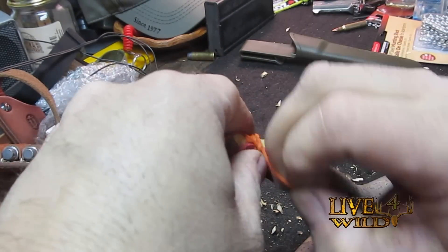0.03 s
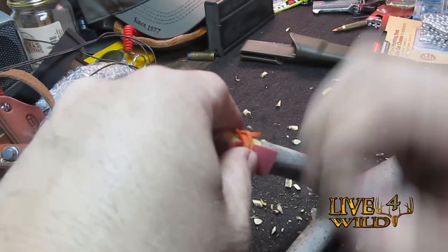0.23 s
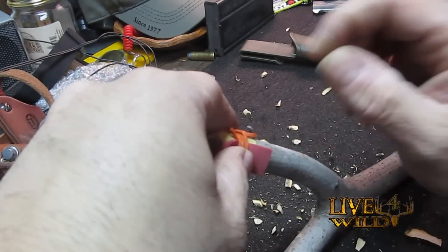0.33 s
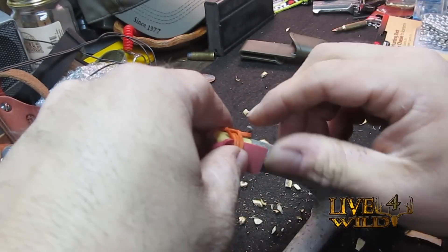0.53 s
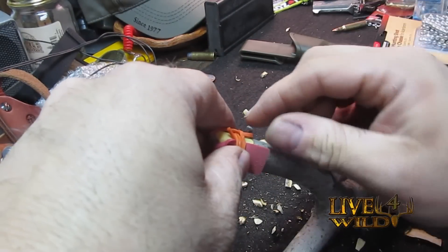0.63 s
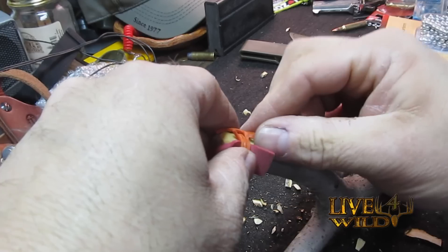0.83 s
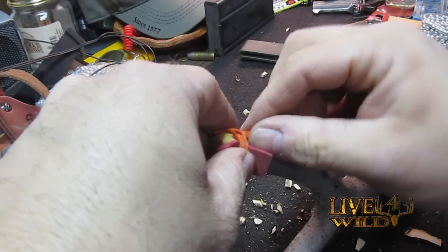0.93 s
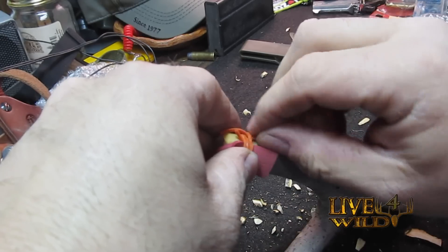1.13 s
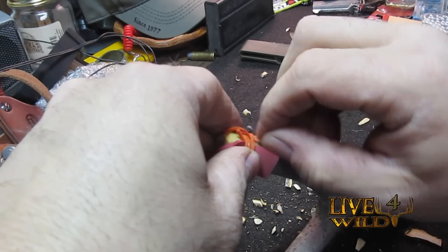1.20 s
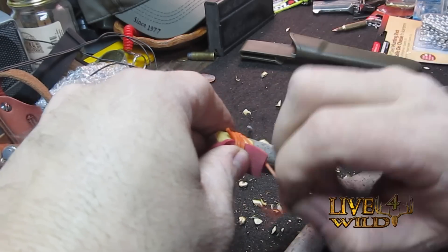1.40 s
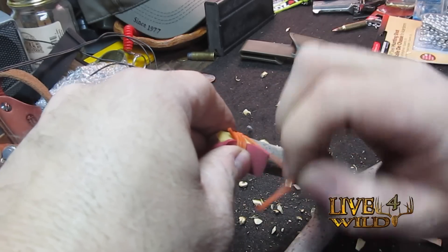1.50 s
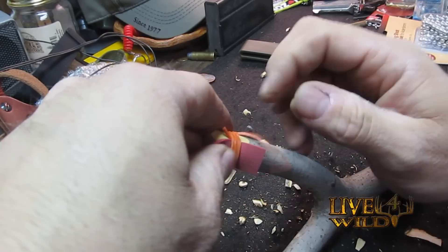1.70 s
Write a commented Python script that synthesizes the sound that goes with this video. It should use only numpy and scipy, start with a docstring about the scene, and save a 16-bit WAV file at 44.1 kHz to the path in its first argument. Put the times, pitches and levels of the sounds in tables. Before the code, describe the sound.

A stretched elastic band snaps sharply up close, then its loose end slaps back more softly.

```python
"""A cluttered workbench in a small, dry room, where fingers work an elastic band close to the microphone.
The taut band snaps once, hard: the impact excites damped modes of the held piece and the bench, and the
freed band twangs. Later its loose end slaps back. Small hard parts tick, skin rubs on rubber and the hands
bump softly, over room hiss and mains hum. Automatic gain control ducks the background after the snap."""
import sys
import numpy as np
from scipy import signal
from scipy.fft import rfft, irfft
from scipy.io import wavfile
from scipy.ndimage import uniform_filter1d

SR = 44100
rng = np.random.default_rng(int(sys.argv[2]) if len(sys.argv) > 2 else 0)


def digitize_waveform(pressure):
    """Quantize a signal to 16-bit integers and store it at the path in sys.argv[1].

    Rows of a 2-D input are taken as channels; values are limited to [-1, 1].
    """
    field = np.atleast_2d(pressure).T
    bounded = np.clip(field, -1, 1)
    quanta = np.round(bounded * 32767).astype(np.int16)
    wavfile.write(sys.argv[1], SR, quanta)


N = 77175


def amp(db):
    """Decibel law: 20 dB is a factor of ten in amplitude."""
    return 10 ** (np.asarray(db) / 20)


def unit(x):
    """Normalisation to rms 1."""
    return x / np.sqrt(np.mean(x ** 2) + 1e-20)


def read(points, hz):
    """Interpolation on a log-frequency axis."""
    f, value = np.transpose(points)
    return np.interp(np.log(hz + 1), np.log(f + 1), value)


def pan(db):
    """Level-difference panning: the left gain exceeds the right by db."""
    return amp(np.array([[db / 2], [-db / 2]]))


def add(mix, s, sound):
    """Superposition: a stereo sound joins the mix at s seconds."""
    part = mix[:, max(round(s * SR), 0):][:, :sound.shape[1]]
    part += sound[:, :part.shape[1]]


def correlate(z, correlation):
    """Partial correlation: two independent channels are mixed to share a component."""
    correlation = np.clip(correlation, -1, 1)
    return np.array([z[0], correlation * z[0] + np.sqrt(1 - correlation ** 2) * z[1]])


def noise(spectrum, correlation):
    """Spectral shaping of white noise gives steady, coloured stereo noise of rms 1."""
    hz = np.fft.rfftfreq(N, 1 / SR)
    white = correlate(rfft(rng.standard_normal((2, N))), read(correlation, hz))
    return unit(irfft(white * amp(read(spectrum, hz)), N))


# Imbalance of the two microphone ports for close sounds: (frequency [Hz], left-right [dB])
PORT_BALANCE = [(200, 1), (1500, -1.5), (2500, -2.5), (4000, -2.5), (7000, 1.5), (9300, 0)]


def impulse(spectrum, tilt_db_per_octave=0, size=4096):
    """Minimum-phase response of a spectrum at the two ports, mean energy 1."""
    hz = abs(np.fft.fftfreq(size, 1 / SR))
    gain_db = read(spectrum, hz) + tilt_db_per_octave * np.log2(hz + 1)
    gain_db = gain_db + np.outer([.5, -.5], read(PORT_BALANCE, hz))
    response = np.exp(np.conj(signal.hilbert(np.log(amp(gain_db)))))
    pulse = np.fft.ifft(response).real[:, :size // 2]
    return pulse * np.sqrt(2) / np.linalg.norm(pulse)


def contact(decay_s, correlation, size=4096, phase_corner_hz=1500):
    """Broadband excitation: a quick rattle of tiny contacts, energy 1 per channel."""
    age = np.arange(size) / SR / decay_s
    envelope = (.15 + age) * np.exp(-1.6 * age)
    burst = rng.standard_normal(size) * envelope
    for _ in range(12):  # flatten the spectrum and restore the envelope in turn
        flat = rfft(burst)
        flat /= abs(flat) + 1e-12
        burst = irfft(flat)
        burst = burst * envelope / np.sqrt(abs(uniform_filter1d(burst ** 2, size=12)) + 1e-12)
    # The ports differ in phase, more so above the corner
    hz = np.fft.rfftfreq(size, 1 / SR)
    wander = unit(uniform_filter1d(uniform_filter1d(rng.standard_normal(len(hz)), size=90), size=90))
    phase = wander * np.arccos(correlation) * (hz + phase_corner_hz / 4) / (hz + phase_corner_hz)
    burst = irfft(flat * np.exp(1j * np.outer([.5, -.5], phase))) * np.exp(-(age / 6) ** 4)
    return burst / np.linalg.norm(burst, axis=1, keepdims=True)


def strike(spectrum, modes, db, contact_s, pan_db, tilt_db_per_octave=0):
    """Impact: a crack, its early reflections from hands and bench, and exponentially damped modes."""
    t = np.arange(SR // 3) / SR
    arrivals = np.zeros((2, len(t)))
    blow = contact(contact_s, correlation=.69)
    reflections = amp(-10.5) * contact(decay_s=.0035, correlation=.57)
    add(arrivals, 0, blow)
    add(arrivals, .0012, reflections)
    crack = signal.fftconvolve(arrivals, impulse(spectrum, tilt_db_per_octave), axes=1)[:, :len(t)]
    resonance = sum(amp(level - 60 * t / t60) * np.sin(2 * np.pi * hz * t) for hz, level, t60 in modes)
    ring = signal.fftconvolve(blow, resonance[None])[:, :len(t)]
    return amp(db) * pan(pan_db) * (crack + ring)


# Mains harmonics: (frequency [Hz], level [dB])
HUM_PARTIALS = [(60, -65.5), (120, -60)]
# Room hiss: (frequency [Hz], relative density [dB])
AIR_SPECTRUM = [(20, -18), (45, -6.5), (85, -2.5), (150, -4.5), (270, -1), (420, -5.5), (650, -9),
                (1000, -12), (1500, -11.5), (1750, -9.5), (2100, -8), (2400, -13.5), (2800, -11),
                (3300, -17.5), (4000, -18.5), (4700, -22), (5200, -19.5), (5550, -8.5), (5800, -15.5),
                (6100, -22.5), (7500, -24), (8400, -21.5), (9000, -24.5), (10400, -26.5)]
# Likeness of the two channels: (frequency [Hz], correlation [0-1])
AIR_CORRELATION = [(100, 0.3), (300, 0.24), (600, 0.19), (1700, .25), (3000, 0), (4800, 0.6), (5550, 0.28),
                   (6500, 0.5), (10000, 0.3)]


def air():
    """Stationary background: harmonic mains hum, and hiss with a narrow peak heard as a thin whine."""
    t = np.arange(N) / SR
    hum = sum(amp(db) * np.sqrt(2) * np.sin(2 * np.pi * (hz * t + rng.random()))
              for hz, db in HUM_PARTIALS)
    hiss = amp(-52.5) * noise(AIR_SPECTRUM, AIR_CORRELATION)
    return pan(db=-1.8) * (hiss + hum)


# Reverberation time of the room: (frequency [Hz], T60 [s])
ROOM_DECAY = [(150, 0.256), (300, .3), (800, 0.24), (2500, 0.13), (9000, 0.13)]


def room(x, level_db=-12, delay_s=.004):
    """Reverberation: a short diffuse tail decays exponentially, its treble first."""
    diffuse = correlate(rng.standard_normal((2, SR // 2)), correlation=.58)
    hz, t, bands = signal.stft(diffuse, SR, nperseg=256)
    tail = signal.istft(bands * amp(-60 * t / read(ROOM_DECAY, hz)[:, None]), SR)[1]
    out = np.zeros((2, N))
    add(out, delay_s, signal.fftconvolve(x, tail / np.linalg.norm(tail[0]), axes=1))
    return amp(level_db) * out


# Gaussian finger strokes: (centre time [s], standard deviation [s], level [dB])
RUB_STROKES = [(0.07, 0.12, -59.5), (0.414, 0.032, -52.5), (0.85, .03, -59.5), (0.957, 0.042, -57),
               (1.093, 0.033, -57), (1.386, 0.017, -55), (1.522, 0.02, -52), (1.72, 0.084, -55.5)]
# Friction noise: (frequency [Hz], relative density [dB])
RUB_SPECTRUM = [(100, -8), (1000, 0), (2500, -1.5), (4000, -1), (6000, -4), (10400, -13.5)]


def rubs(grain_db=3):
    """Sliding friction: skin on rubber makes a fine-grained hiss."""
    t = np.arange(N) / SR
    strokes = sum(amp(db) * np.exp(-((t - s) / width) ** 2 / 2) for s, width, db in RUB_STROKES)
    grain = unit(amp(grain_db * unit(uniform_filter1d(rng.standard_normal(N), size=60))))
    return strokes * grain * noise(RUB_SPECTRUM, AIR_CORRELATION)


# Bumps of the hands: (time [s], energy [dB], decay time [s])
BUMP_EVENTS = [(0.005, -22, 0.023), (0.632, -23, .007), (0.776, -24.5, 0.018), (0.885, -26, 0.024),
               (1.035, -24.5, 0.0156), (1.415, -21.5, .02), (1.490, -14.5, .011), (1.572, -22.5, 0.0126)]
# Dull thud: (frequency [Hz], relative level [dB])
BUMP_SPECTRUM = [(40, -29), (130, -1), (250, 7.5), (400, -8.5), (800, -14.5), (3000, -16), (10000, -40)]


def bumps():
    """Soft impact: the hands bump with most of their energy at low frequencies."""
    out = np.zeros((2, N))
    for s, db, decay_s in BUMP_EVENTS:
        blow = contact(decay_s, correlation=.88)
        add(out, s, amp(db) * signal.fftconvolve(blow, impulse(BUMP_SPECTRUM), axes=1))
    return out


# Light tick: (time [s], energy [dB], contact time [s], left-right [dB])
TICK_EVENTS = [(0.3915, -18.5, 0.00155, -8)]
# Its attack: (frequency [Hz], relative level [dB])
TICK_SPECTRUM = [(100, -4), (1000, -8), (2200, -12), (2800, -7), (3800, -3), (4700, -14), (5900, 6),
                 (7300, -0.5), (8300, -7), (10200, -4)]
# Resonances of the small part: (frequency [Hz], relative level [dB], T60 [s])
PART_MODES = [(2230, -23.5, 0.039), (5900, -25, .025), (6551, -28, .045), (7320, -31, .025)]


def ticks():
    """Modal ringing: a small hard part, lightly knocked, sounds its high modes."""
    out = np.zeros((2, N))
    for s, *blow in TICK_EVENTS:
        add(out, s, strike(TICK_SPECTRUM, PART_MODES, *blow))
    return out


# Dry clicks: (time [s], energy [dB], contact time [s], left-right [dB], tilt [dB/octave])
CLICK_EVENTS = [(0.5898, -24, .001, -8, 14.5), (1.7400, -9, 0.00026, -1.5, -0.5)]
# Their attack before the tilt: (frequency [Hz], relative level [dB])
CLICK_SPECTRUM = [(60, -16), (250, -9), (600, -22), (1200, -4.5), (1700, -7), (2050, 3.5), (2600, 0),
                  (4200, 2), (5000, -3.5), (7000, 0), (9000, -9.5), (10400, -17)]
# Held piece and bench, also struck by the band: (frequency [Hz], relative level [dB], T60 [s])
BENCH_MODES = [(286, -54, 0.26), (1487, -48.5, .07), (2064, -40.5, 0.031), (2534, -34, 0.03),
               (3320, -46, 0.02), (5650, -54, 0.071), (6750, -46, 0.032), (9550, -52, .035)]


def clicks():
    """Hard impact: brief contacts of handled parts excite a wide band of frequencies."""
    out = np.zeros((2, N))
    for s, *blow in CLICK_EVENTS:
        add(out, s, strike(CLICK_SPECTRUM, BENCH_MODES, *blow))
    return out


# Hiss around snap and slap: (peak time [s], lead [s], trail [s], peak level [dB], rise over lead [dB])
SWELL_EVENTS = [(0.175, 0.057, 0.041, -34, 11), (1.491, 0.033, 0.036, -43.5, 7.5)]
# Its colour: (frequency [Hz], relative density [dB])
SWELL_SPECTRUM = [(100, -25), (700, 2), (2500, 0), (4000, -2.5), (6000, -4), (9300, -0.5), (10400, -3.5)]


def swells(fade_s=.014):
    """Amplitude modulation of noise: a short hiss grows until the band lands, then fades."""
    t = np.arange(N) / SR
    envelope = np.zeros(N)
    for s, lead, trail, db, rise_db in SWELL_EVENTS:
        gate = np.clip(np.minimum(t - s + lead, s + trail - t) / fade_s, 0, 1)
        envelope += gate * amp(db - rise_db * np.clip(abs(t - s) / lead, 0, 1))
    return envelope * noise(SWELL_SPECTRUM, correlation=[(100, .58), (10000, .17)]) * pan(db=-2.5)


# Landings of the loose end: (time [s], energy [dB], contact time [s], left-right [dB])
SLAP_EVENTS = [(1.4891, -8, .0014, -3), (1.4911, -6, 0.0008, -4.5)]
# Their attack: (frequency [Hz], relative level [dB])
SLAP_SPECTRUM = [(40, -26), (110, -3), (200, -5), (400, -15), (600, -2.5), (850, -8), (1300, -17.5),
                 (1700, -9.5), (2030, 4), (2300, -10), (2520, 2.5), (2850, -10.5), (3700, 0.5),
                 (4700, -11.5), (5700, -3), (6500, -10.5), (7500, -14.5), (8400, -13), (10400, -19)]


def slap():
    """Temporal fusion: two impacts of the band's loose end, 2 ms apart, are heard as one slap."""
    out = np.zeros((2, N))
    for s, *blow in SLAP_EVENTS:
        add(out, s, strike(SLAP_SPECTRUM, BENCH_MODES, *blow))
    return out


def twang(start_hz=209.2, rise_hz_per_s=590, level_db=-36, t60_s=.21):
    """Damped free vibration: the freed band sounds a low note that rises as it settles."""
    t = np.arange(SR // 4) / SR
    cycles = np.cumsum(start_hz + rise_hz_per_s * t) / SR
    return amp(level_db - 60 * t / t60_s) * np.sin(2 * np.pi * cycles)


# Crack of the taut band: (frequency [Hz], relative level [dB])
SNAP_SPECTRUM = [(40, -18), (110, -10), (220, -8.5), (350, -3.5), (600, -7.5), (1100, -6), (1800, -8),
                 (2200, -4.5), (2520, 2), (3000, -3), (4000, -2), (5000, -7), (5600, -6.5), (6100, -11),
                 (6620, -2), (7300, -11), (8100, -8.5), (8900, -2), (9600, -2.5), (10400, -12)]


def snap(time_s=.1702, pan_db=-2):
    """Release of elastic energy: the taut band lands in one hard impact and twangs."""
    out = np.zeros((2, N))
    add(out, time_s, strike(SNAP_SPECTRUM, BENCH_MODES, db=9.5, contact_s=.00065, pan_db=pan_db))
    add(out, time_s, pan(pan_db) * twang())
    return out


def scene():
    """Superposition of the sharp impacts, their reverberation, the handling and the background."""
    impacts = snap() + slap() + ticks() + clicks()
    return impacts + room(impacts) + swells() + rubs() + bumps() + air()


def band_limit(x, cutoff_hz=10700):
    """Linear-phase filtering: a steep low-pass."""
    taps = signal.firwin(301, cutoff_hz, window=("kaiser", 8), fs=SR)
    return signal.oaconvolve(x, taps[None], "same")


def record(dry):
    """Automatic gain control dips after a loud sound and recovers slowly; saturation rounds the peaks."""
    threshold_db, recovery_db_per_s, attack_s, ceiling = -23, 23, .052, .95
    window = SR // 100
    power = signal.lfilter(np.ones(window) / window, 1, (dry ** 2).mean(0))
    recovery_db = np.arange(N) / SR * recovery_db_per_s
    held_db = np.maximum.accumulate(10 * np.log10(power + 1e-12) + recovery_db) - recovery_db
    excess_db = np.maximum(held_db - threshold_db, 0)
    pole = np.exp(-1 / (attack_s * SR))
    reduction_db = signal.lfilter([1 - pole], [1, -pole], excess_db)
    ducked = band_limit(dry / amp(reduction_db))
    return band_limit(ducked / (1 + (ducked / ceiling) ** 4) ** .25)


dry = scene()
out = record(dry)
digitize_waveform(out)
```